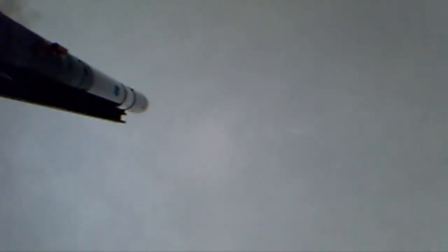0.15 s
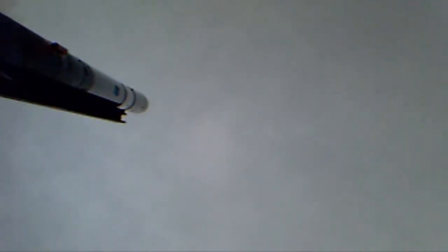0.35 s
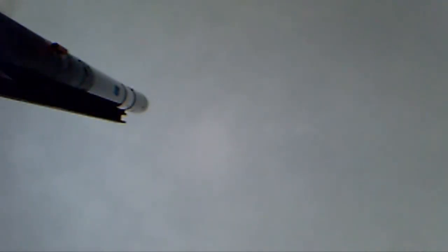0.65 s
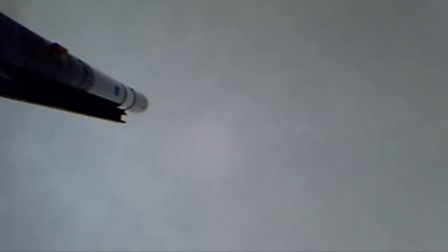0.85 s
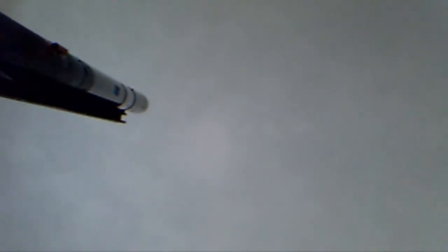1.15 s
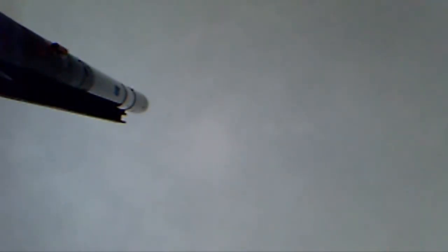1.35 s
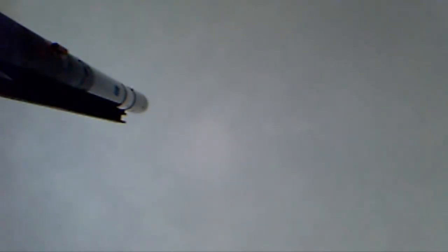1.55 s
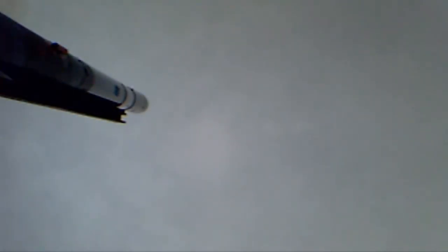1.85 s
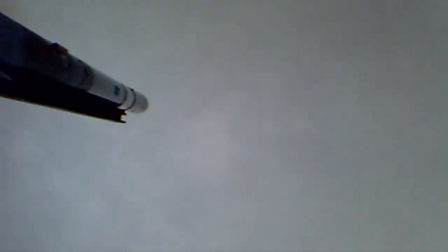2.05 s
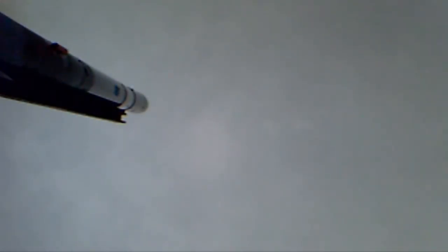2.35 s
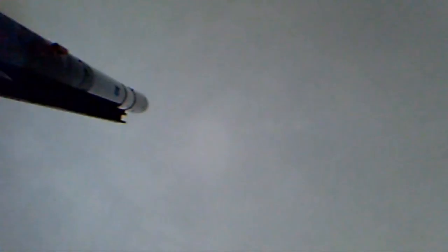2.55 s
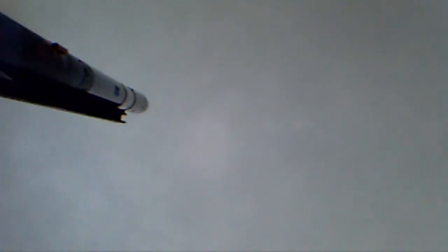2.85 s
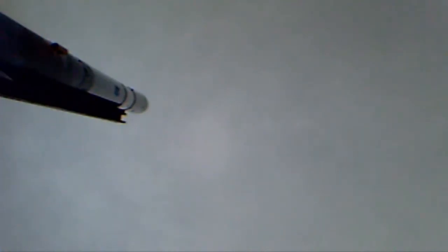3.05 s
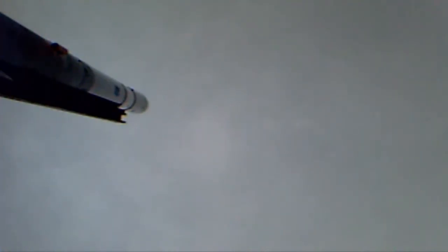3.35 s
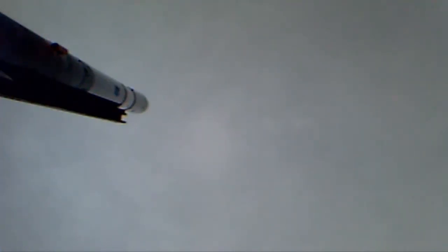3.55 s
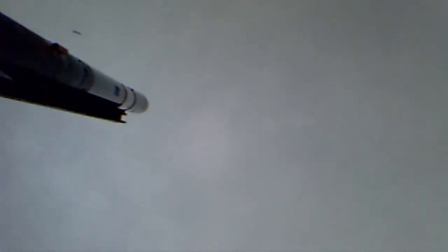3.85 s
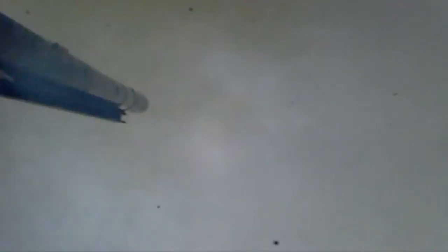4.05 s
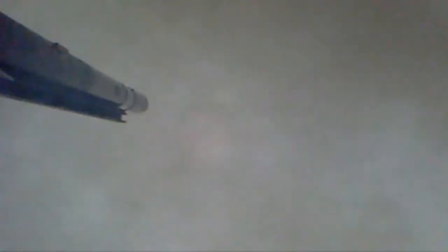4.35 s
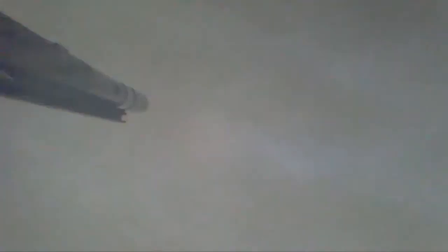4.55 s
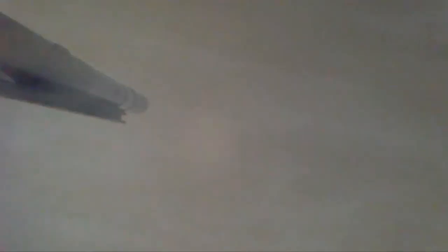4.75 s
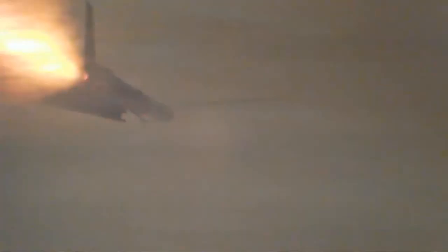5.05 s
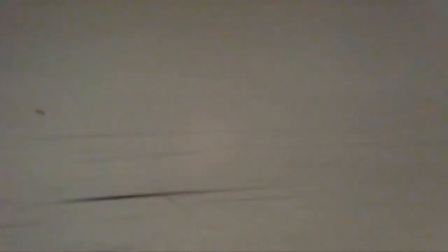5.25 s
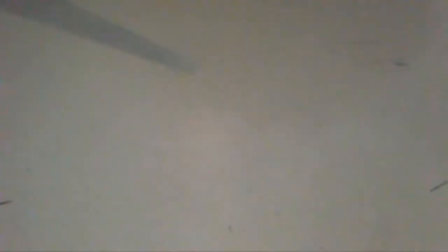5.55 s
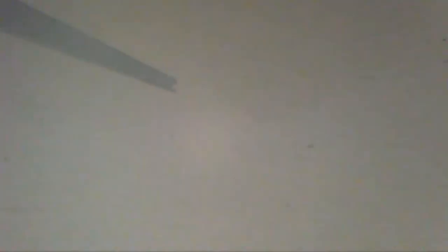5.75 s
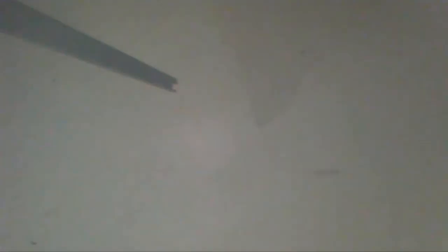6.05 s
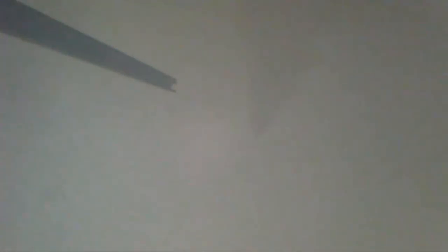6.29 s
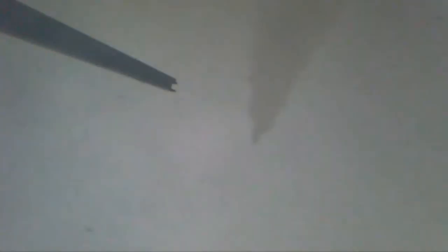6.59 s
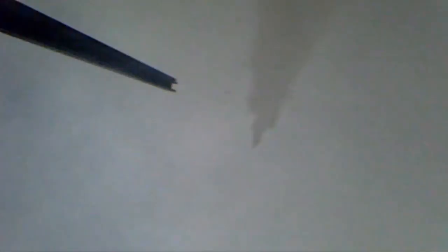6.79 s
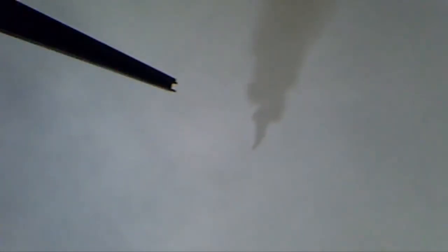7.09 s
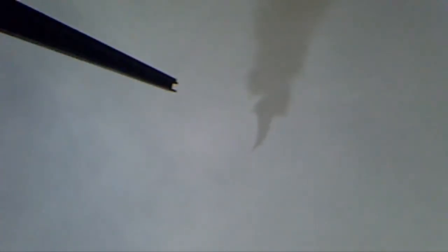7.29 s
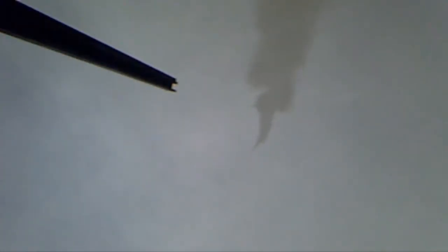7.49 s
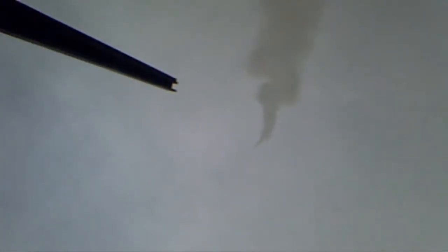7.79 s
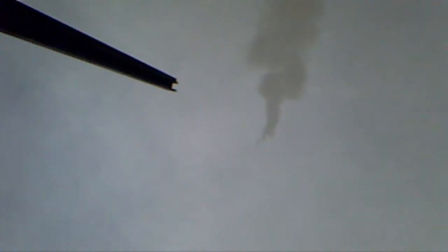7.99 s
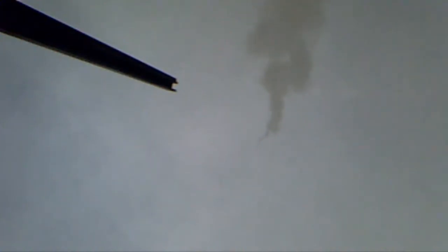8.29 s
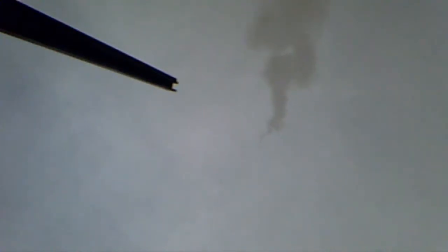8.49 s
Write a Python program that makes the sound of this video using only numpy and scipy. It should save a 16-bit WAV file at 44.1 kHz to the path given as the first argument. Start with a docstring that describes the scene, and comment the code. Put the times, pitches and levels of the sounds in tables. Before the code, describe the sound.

A small microphone beside a launch rail picks up hissing, faintly whistling gas and a low fluttering rumble. A harsh jet builds, then stutters with sharp ignition bursts and brief dropouts. The rocket motor blasts into a distorted roar, quickly losing its treble as it climbs. A distant wavering rush and scattered pops follow, dying down to a far rumble and soft wind in the open field.

```python
"""Rocket launch at close range

Venting gas hisses, whistles and buffets the microphone of a small camera beside the rail.
The turbulent jet swells to a shriek and chokes three times as the motor coughs and catches.
The full roar overloads the microphone, then turns dull and crackly as the rocket climbs and the air
absorbs its treble. The burning grain pops, and burnout leaves a far rumble in the wind."""
import sys
import numpy as np
from scipy import signal
from scipy.fft import rfft, irfft
from scipy.io import wavfile
from scipy.ndimage import uniform_filter1d, map_coordinates

SR = 44100
rng = np.random.default_rng(int(sys.argv[2]) if len(sys.argv) > 2 else 0)


def generate_wav(signal):
    """Clip the signal to [-1, 1] and save it as 16-bit WAV at the path in sys.argv[1]."""
    frames = np.transpose(np.atleast_2d(signal))
    scaled = np.clip(frames, -1, 1) * 32767
    pcm = np.round(scaled).astype(np.int16)
    wavfile.write(sys.argv[1], SR, pcm)


N = 380532
TIME = np.arange(N) / SR
FREQS = np.fft.rfftfreq(N, 1 / SR)
FIRST_CHOKE_S, BURNOUT_S = 3.68, 7.42

# spectra of turbulent flow: (frequency [Hz], relative level [dB])
GUST_SPECTRUM = [(5, 5.5), (20, 1.5), (50, -5), (120, -10.5), (300, -33), (1000, -64)]
HISS_SPECTRUM = [(40, -16), (170, -6.5), (350, -5.5), (530, -1.5), (660, -8), (950, 2.5), (1250, -2),
                 (1500, 2), (1800, -8), (2050, -15), (2300, -25.5), (4000, -50)]
TREBLE_SPECTRUM = [(1900, -30), (2300, -7.5), (2650, 4.5), (3400, 1.5), (4200, -2.5), (5200, -3.5),
                   (6500, -5), (7300, -13.5), (8500, -11), (10000, -35), (15000, -24.5)]
SHRIEK_SPECTRUM = [(1500, -26.5), (3000, 1.5), (5000, 4), (8000, -5), (11000, -5), (15000, -8.5)]
LOW_ROAR_SPECTRUM = [(40, -22), (100, -5), (180, 1.5), (280, 1), (400, 0), (530, 1), (630, -8.5),
                     (900, -66), (2000, -66)]
# resonances and one notch of the gas jet: (frequency [Hz], width [Hz], gain [dB])
JET_RESONANCES = [(1390, 44, 1), (2220, 250, -7), (2962, 230, 5), (5880, 390, 10.5), (6760, 200, 6),
                  (7870, 260, 10.5), (14100, 700, 8.5)]
# after each choke the jet returns as a growing leak, then bursts through:
# (burst time [s], end [s], leak level [dB], burst level [dB], relative treble [dB])
JET_BURSTS = [(3.814, 3.819, -30.5, -8, -0.5), (3.945, 3.984, -37, -15, 1), (4.23, 5.047, -37.5, -15, -2)]


def gain_of(db):
    """Amplitude ratio of a level in decibels."""
    return 10 ** (np.asarray(db) / 20)


def unit_rms(x):
    """Normalisation to an rms of 1."""
    return x / np.sqrt(np.mean(x ** 2) + 1e-20)


def curve(rows, column=1):
    """Linear interpolation of one column of a timed table at every sample."""
    columns = np.transpose(rows)
    return np.interp(TIME, columns[0], columns[column])


def onset(s):
    """Linear fade-in over the 30 ms before time s."""
    return np.clip((TIME - s) / 0.03 + 1, 0, 1)


def since(s):
    """Seconds elapsed since time s, zero before it."""
    return np.maximum(TIME - s, 0)


def bump(s, half):
    """Gaussian envelope of height 1 around time s."""
    return np.exp(-((TIME - s) / half) ** 2)


def add(mix, s, sound):
    """Superposition of a sound on the mix at time s."""
    part = mix[round(s * SR):][:len(sound)]
    part += sound[:len(part)]


def coloured(x, spectrum, peaks=()):
    """Zero-phase filtering by a spectral envelope with bell-shaped peaks or notches."""
    hz, db = np.transpose(spectrum)
    db = np.interp(np.log(FREQS + 1), np.log(hz), db)
    for centre, width, height in peaks:
        db = db + height / (1 + (2 * (FREQS - centre) / width) ** 2)
    return irfft(rfft(x) * gain_of(db), N)


def eddies(cutoff_hz):
    """Slow random fluctuation: low-pass noise of rms 1."""
    return unit_rms(irfft(rfft(rng.standard_normal(N)) / (1 + (FREQS / cutoff_hz) ** 4), N))


def turbulence(spectrum, peaks=()):
    """Flow noise: Gaussian noise of rms 1 with a given spectrum."""
    return unit_rms(coloured(rng.standard_normal(N), spectrum, peaks))


def glide(spectrum, hz):
    """Time scaling of noise slides the 1 kHz point of its spectrum along the curve hz."""
    position = np.cumsum(hz) / 1000
    return map_coordinates(turbulence(spectrum), [position % (N - 1)], order=3)


def field_hiss():
    """Ambient noise: the faint broadband hiss of the open field."""
    # strength of the hiss: (time [s], level [dB])
    levels = [(0, -68.5), (7.6, -64), (8.0, -60.5), (8.6, -56)]
    # its spectrum: (frequency [Hz], relative level [dB])
    spectrum = [(50, 11), (200, -6), (600, 22), (1000, 9.5), (2000, 16.5), (3000, 2), (5000, 4),
                (9000, 1.5), (15000, -6.5)]
    return gain_of(curve(levels)) * turbulence(spectrum)


def camera_whine():
    """Steady pure tones superpose into a thin whine."""
    # partials: (frequency [Hz], rms level [dB])
    partials = [(5599, -78.5), (6702, -80.5), (7402, -80.5), (9598, -89.5)]
    return sum(gain_of(db) * np.sqrt(2) * np.sin(2 * np.pi * hz * TIME) for hz, db in partials)


def baseline_wander(wander_db=-46, growth_db_per_s=11):
    """Offset drift: a slow, inaudible wander of the signal's baseline, growing at the end."""
    return gain_of(wander_db + growth_db_per_s * since(BURNOUT_S)) * eddies(3.2)


def wind():
    """Pseudo-sound: wind and puffs of exhaust press directly on the microphone."""
    # wind on the microphone: (time [s], level [dB])
    breeze = [(3, -44), (4.05, -63), (5.3, -45), (6.1, -53), (6.7, -65), (7.6, -64), (8.3, -53.5),
              (8.6, -46)]
    # puffs of exhaust: (time [s], level [dB], half length [s])
    exhaust_puffs = [(3.509, -13.5, 0.014), (3.695, -19, 0.0037), (4.294, -33.5, 0.21), (4.723, -35, 0.29),
                     (5.001, -31, 0.043), (5.097, -30, .014), (5.155, -27, 0.022), (5.231, -32, 0.022)]
    puffs = sum(gain_of(db) * bump(s, half) for s, db, half in exhaust_puffs)
    return (gain_of(curve(breeze)) + puffs) * turbulence(GUST_SPECTRUM)


def grit(decay_s=0.0013):
    """Impact noise: thrown grit ticks on the camera case and decays exponentially."""
    # impacts: (time [s], level [dB])
    ticks = [(5.205, -48), (5.962, -38)]
    envelope = np.zeros(N)
    for s, db in ticks:
        add(envelope, s, gain_of(db) * np.exp(-TIME[:SR // 20] / decay_s))
    return envelope * turbulence([(1000, -17), (3500, 3), (6000, 0), (7800, 1), (10000, -13), (15000, -4)])


def overload_crackle(per_s):
    """Shot noise of rms 1: sparse sharp clicks, like an overloading microphone, flicker in the hiss."""
    clicks = (rng.random(N) < per_s / SR) * rng.standard_normal(N)
    return unit_rms(coloured(clicks, SHRIEK_SPECTRUM))


def whistle(hz, half_width_hz):
    """Broad resonance: narrow-band noise centred on the curve hz."""
    phase = 2 * np.pi * np.cumsum(hz) / SR
    low_pass = 1 / (1 + (FREQS / half_width_hz) ** 2)
    in_phase, quadrature = irfft(rfft(rng.standard_normal((2, N))) * low_pass, N)
    return unit_rms(in_phase * np.cos(phase) + quadrature * np.sin(phase))


def vent(sputter_db=0.96, gusting_db=1.6, crackle_db=-31):
    """Turbulent outflow hisses, whistles and buffets the microphone; it breaks once, then stops."""
    # gas striking the microphone: (time [s], rumble level [dB], flutter level [dB])
    buffet_levels = [(0, -20, -25), (.8, -20, -22.5), (1.5, -19, -21.5), (1.7, -14.5, -22.5),
                     (2.12, -15.5, -20.5), (2.3, -23, -19.5), (2.6, -19, -16), (2.9, -25.5, -12.5)]
    # spectra of that buffeting: (frequency [Hz], relative level [dB])
    rumble_spectrum = [(10, 5), (25, -3.5), (60, 1), (110, -1.5), (170, -7), (300, -27.5), (1000, -57)]
    flutter_spectrum = [(60, -25), (130, -4.5), (200, -1), (300, -3.5), (420, -5.5), (560, -7.5),
                        (680, -25), (1000, -23.5), (3000, -66)]
    # hiss of the stream: (time [s], level [dB], relative treble [dB])
    hiss_levels = [(0, -25.5, -12.5), (.25, -26, -11.5), (.45, -23.5, -12), (.9, -22.5, -11.5),
                   (1.15, -24.5, -11), (1.7, -21, -8.5), (2.05, -24, -8), (2.2, -30.5, -7),
                   (2.55, -26, -7.5), (2.94, -30.5, -8.5)]
    # spurts of the stream: (time [s], gain [dB], half length [s])
    spurts = [(0.185, 3, 0.018), (0.239, 3, 0.012), (.318, 3, 0.012), (0.89, 2, 0.026)]
    # breathy whistles:
    # (starting pitch [Hz], rise [Hz/s], half width [Hz], level [dB], peak time [s], half length [s])
    resonances = [(1045, 115, 91, -25.5, .5, 1.29), (2774, 175, 134, -35.5, 0.83, .95)]
    # directivity of the vent, which faces away: (frequency [Hz], gain [dB])
    off_axis = [(200, -5.5), (400, 3.5), (900, -1), (1600, -2), (3000, -1.5), (4500, 0), (6000, -2),
                (9000, -7.5), (14000, -2)]
    break_s, break_length_s, break_db = 2.097, 0.023, -19
    stop_s, valve_db_per_s = 2.952, 2000

    rumble = gain_of(curve(buffet_levels)) * turbulence(rumble_spectrum)
    flutter = gain_of(curve(buffet_levels, column=2)) * turbulence(flutter_spectrum)
    treble = gain_of(curve(hiss_levels, column=2)) * turbulence(TREBLE_SPECTRUM, JET_RESONANCES)
    stream = turbulence(HISS_SPECTRUM) + treble + gain_of(crackle_db) * overload_crackle(per_s=45)
    hiss = coloured(gain_of(curve(hiss_levels)) * stream, off_axis)
    whistles = sum(gain_of(db) * bump(s, half) * whistle(hz + rise * TIME, width)
                   for hz, rise, width, db, s, half in resonances)
    spurt_db = sum(db * bump(s, half) for s, db, half in spurts)
    gap = uniform_filter1d(1. * ((TIME > break_s) & (TIME < break_s + break_length_s)), size=130)
    flow = gain_of(break_db * gap - valve_db_per_s * since(stop_s))
    gusting = gain_of(gusting_db * eddies(27))
    sputter = gain_of(spurt_db + sputter_db * eddies(63))
    return flow * (gusting * (rumble + flutter) + sputter * (hiss + whistles))


def grain_pops(echo_s=0.0016, echo_gain=0.2, scatter_gain=0.67, scatter_s=0.0071):
    """Multipath propagation: pulses of the burning grain arrive direct, off the ground and scattered."""
    # pressure pulses: (time [s], level before filtering [dB], length of the compression [s])
    pops = [(6.783, -21, 0.0011), (6.788, -20.5, 0.0015), (6.809, -17.5, 0.00059), (6.814, -18.5, .0005),
            (6.8545, -13, .00082), (6.858, -30, 0.0022), (7.057, -21, 0.0006), (7.185, -23.5, 0.00045),
            (7.313, -13, 0.00022), (7.316, -13, 0.00029), (7.34, -29, 0.00043), (7.344, -21, 0.00037),
            (7.47, -30.5, 0.00065), (7.52, -28, 0.00041)]
    # their colour: (frequency [Hz], gain [dB])
    pop_response = [(60, -29), (200, 8), (500, 9.5), (650, -6), (800, 8), (1100, 12.5), (1300, -11),
                    (1600, -12), (2100, -32), (3200, -56)]
    pressure, t = np.zeros(N), TIME[:SR // 30]
    for s, db, compression_s in pops:
        age = t / compression_s
        pulse = gain_of(db) * (1 - age) * np.exp(-age)
        paths = rng.standard_normal(len(t)) * np.exp(-t / scatter_s)
        scattered = signal.fftconvolve(pulse, paths / np.linalg.norm(paths))[:len(t)]
        add(pressure, s, pulse)
        add(pressure, s + echo_s, echo_gain * pulse + scatter_gain * scattered)
    return coloured(pressure, pop_response)


def far_exhaust(shocks_per_s=900, shock_share=0.21, body_follows=0.24, waver_db=0.8, rasp_db=1.5):
    """Noise and small shocks from the sky, dulled by air absorption and notched by the ground echo."""
    # swells on the moving air: (time [s], half length [s], roar gain [dB], sizzle gain [dB])
    swells = [(5.18, 0.056, 6.5, 9), (5.702, 0.27, 7, 15), (6.543, 0.33, 5.5, 5.5), (6.98, 0.087, 2.5, 5),
              (7.2, 0.23, 7.5, 10), (7.79, 0.09, 6.5, 4), (8.42, .15, 4, 2.5)]
    # spectra of the far exhaust: (frequency [Hz], relative level [dB])
    roar_spectrum = [(450, -10.5), (650, -5.5), (770, 1.5), (1130, 1), (1280, -5.5), (1500, -4.5),
                     (1850, -13), (2200, -29), (2650, -30), (3000, -36), (3450, -30), (4200, -43),
                     (9000, -50.5)]
    sizzle_spectrum = [(1200, -10), (2200, -3), (2650, 3), (3000, -1), (3450, 6), (4100, -8.5),
                       (4700, -5.5), (7500, -13), (10000, -34), (15000, -32)]
    # destructive interference with the ground echo: (frequency [Hz], width [Hz], gain [dB])
    notches = [(650, 51, -5), (1300, 76, -4)]
    start_s, roar_db, body_db, sizzle_db = 5.06, -41.5, -37, -71.5
    thin_s, thin_db_per_s, thin_depth_db = 6.91, 36, 23.5  # the low body thins out before burnout
    burnout_db_per_s, burnout_depth_db = 66.5, 13.5

    swell_db = sum(db * bump(s, half) for s, half, db, _ in swells)
    bright_db = sum(db * bump(s, half) for s, half, _, db in swells)
    burnout_db = np.minimum(burnout_db_per_s * since(BURNOUT_S), burnout_depth_db)
    thin_db = np.minimum(thin_db_per_s * since(thin_s), thin_depth_db)
    shocks = (rng.random(N) < shocks_per_s / SR) * rng.exponential(1, N)
    drive = shock_share * unit_rms(shocks) + rng.standard_normal(N)
    roar = gain_of(roar_db + swell_db - burnout_db) * unit_rms(coloured(drive, roar_spectrum, notches))
    body = gain_of(body_db + body_follows * swell_db - thin_db) * turbulence(LOW_ROAR_SPECTRUM, notches)
    sizzle = gain_of(sizzle_db + bright_db + rasp_db * eddies(90)) * turbulence(sizzle_spectrum)
    return onset(start_s) * gain_of(waver_db * eddies(35)) * (roar + body + sizzle)


def offset_thumps(thump_db=-23, settle_s=0.0083):
    """Transient response: a soft low thump as the microphone's offset settles after each choke."""
    chokes = [FIRST_CHOKE_S] + [row[1] for row in JET_BURSTS[:-1]]
    ages = (since(s) / settle_s for s in chokes)
    return gain_of(thump_db) * sum(age * np.exp(1 - age) for age in ages)


def nozzle_jet(sputter_db=1.63, wash_db=-15):
    """Jet noise builds with pressure, chokes and bursts through, then fades with height, treble first."""
    # the jet as pressure builds: (time [s], level [dB], relative treble [dB])
    build_up = [(2.965, -30.5, -6.5), (3.08, -30, -6), (3.24, -22, -6), (3.32, -21, -7), (3.36, -18.5, 1.5),
                (3.46, -13, -4.5), (3.55, -15, -3.5), (3.63, -10.5, 2), (3.68, -12, -2.5)]
    # brief bright shrieks of the jet as it chokes or bursts through:
    # (time [s], level [dB], half length [s])
    shrieks = [(3.683, 4, .004), (3.819, -10, .007), (3.948, -14, .008)]
    leak_db_per_s, leak_lead_s, burst_rise_s, choke_db_per_s = 149.5, 0.25, 0.01, 1503.5
    lift_s, acceleration_m_per_s2, loss_db_per_m, treble_loss_db_per_m = 4.498, 42, 4, 2.1

    level = onset(build_up[0][0]) * gain_of(curve(build_up) - choke_db_per_s * since(FIRST_CHOKE_S))
    treble = level * gain_of(curve(build_up, column=2))
    for s, end, leak_db, burst_db, treble_db in JET_BURSTS:
        ahead_s = np.maximum(s - TIME, 0)
        leak = onset(s - leak_lead_s) * gain_of(leak_db - leak_db_per_s * ahead_s)
        burst = gain_of(burst_db) * np.exp(-(ahead_s / burst_rise_s) ** 2)
        flow = (leak + burst) * gain_of(-choke_db_per_s * since(end))
        level += flow
        treble += flow * gain_of(treble_db)
    height_m = acceleration_m_per_s2 * since(lift_s) ** 2 / 2
    treble *= gain_of(-treble_loss_db_per_m * height_m)
    body = turbulence(HISS_SPECTRUM, JET_RESONANCES) + gain_of(wash_db) * turbulence(GUST_SPECTRUM)
    jet = level * body + treble * turbulence(TREBLE_SPECTRUM, JET_RESONANCES)
    jet *= gain_of(sputter_db * eddies(110) - loss_db_per_m * height_m)
    shriek_level = sum(gain_of(db) * bump(s, half) for s, db, half in shrieks)
    return jet + shriek_level * turbulence(SHRIEK_SPECTRUM)


def flame(surge_db=1.5, plume_db=-1, fine_db=-7, billow_db=-4, push_db=-6):
    """Combustion noise: the motor coughs, then roars; the pitch falls as the plume's wider end passes."""
    # ignition coughs: (time [s], level [dB], rise [s], decay [s])
    ignitions = [(3.5, -12, .005, 0.013), (3.656, -5.5, 0.015, 0.025), (3.797, -10, 0.002, 0.013),
                 (3.912, -13.5, 0.0013, 0.026), (4.095, -44, 0.0014, 0.0065), (4.112, -28, 0.0017, 0.022),
                 (4.129, -25, 0.0017, 0.015)]
    # roar of the flame on the rail: (time [s], level [dB], centre frequency [Hz])
    passage = [(4.14, -36.5, 888), (4.22, -26.5, 1080), (4.3, -14, 1170), (4.5, -14.5, 1194),
               (4.63, -10.5, 1219), (4.72, -8, 947), (4.88, -19.5, 299), (5.06, -28.5, 230.2),
               (5.12, -35.5, 188.6)]
    # spectra of the plume (centred on 1 kHz), fine eddies and billows:
    # (frequency [Hz], relative level [dB])
    plume_spectrum = [(100, -25.5), (400, -10.5), (650, -2.5), (850, -0.5), (1000, 3), (1250, 0),
                      (1700, -6.5), (3000, -21.5), (8000, -46), (14000, -49)]
    fine_spectrum = [(30, -14.5), (150, -6.5), (300, -7), (530, -7), (650, -9), (800, 5.5), (1050, 9.5),
                     (1400, -10), (1750, -2), (2300, -9), (3200, -19), (5000, -32), (8000, -31.5),
                     (14000, -57)]
    billow_spectrum = [(30, -7), (70, -0.5), (150, 0.5), (300, 0), (550, -1.5), (700, -13), (2000, -44.5)]
    fade_db_per_s = 18

    coughs, t = np.zeros(N), TIME[:SR // 4]
    for s, db, rise, decay in ignitions:
        add(coughs, s, gain_of(db) * np.tanh(t / rise) ** 2 * np.exp(-(t / decay) ** 2))
    burn = onset(passage[0][0]) * gain_of(curve(passage) - fade_db_per_s * since(passage[-1][0]))
    centre_hz = curve(passage, column=2)
    narrowness = centre_hz / centre_hz.max()  # a wide plume has fewer fine eddies and more billows
    plume = gain_of(plume_db) * narrowness ** 0.35 * glide(plume_spectrum, centre_hz)
    fine_eddies = gain_of(fine_db) * narrowness ** 0.15 * turbulence(fine_spectrum, JET_RESONANCES[:3])
    billows = gain_of(billow_db) * (1 - narrowness) * turbulence(billow_spectrum)
    surge = gain_of(surge_db * eddies(55))
    low_push = gain_of(push_db) * coughs * turbulence(LOW_ROAR_SPECTRUM)
    return (coughs + burn) * surge * (plume + fine_eddies + billows) + low_push


def scene():
    """Superposition of all sources at the microphone, in one channel."""
    launch = vent() + nozzle_jet() + offset_thumps() + flame() + far_exhaust() + grain_pops()
    return (launch + grit() + wind() + baseline_wander() + camera_whine() + field_hiss())[None]


def record(dry):
    """Saturation: the microphone flattens loud peaks, then colours the sound and limits its band."""
    # overload ceiling, which sags in the blast: (time [s], level [dB])
    headroom = [(0, -10.4), (4.25, -10.3), (4.6, -11.6), (4.8, -13), (5.0, -14), (5.6, -10.4)]
    # microphone response: (frequency [Hz], gain [dB])
    response = [(20, 1.5), (3000, -1), (6000, -4), (8000, -2), (10000, -6), (14000, -16), (16000, -29.5)]
    edge_hz = 14900
    ceiling = gain_of(curve(headroom))
    oversampled = signal.resample_poly(dry[0] / ceiling, 2, 1)
    saturated = ceiling * signal.resample_poly(np.clip(oversampled, -1, 1), 1, 2)
    band_limit = signal.firwin(255, edge_hz, window=("kaiser", 9), fs=SR)
    return signal.oaconvolve(coloured(saturated, response), band_limit, "same")[None]


dry = scene()
out = record(dry)
generate_wav(out)
```